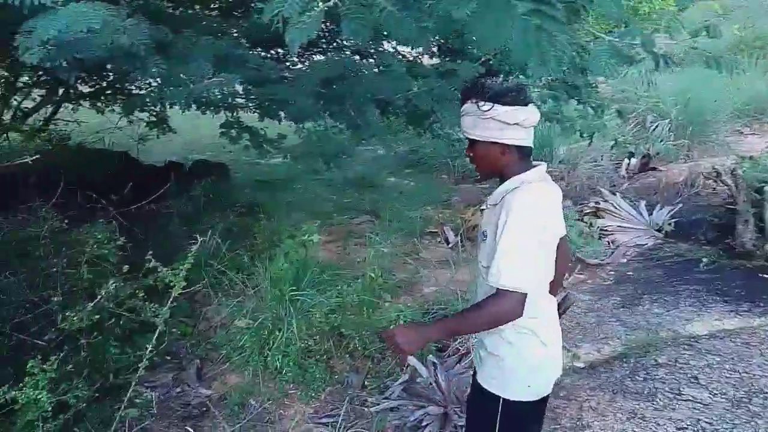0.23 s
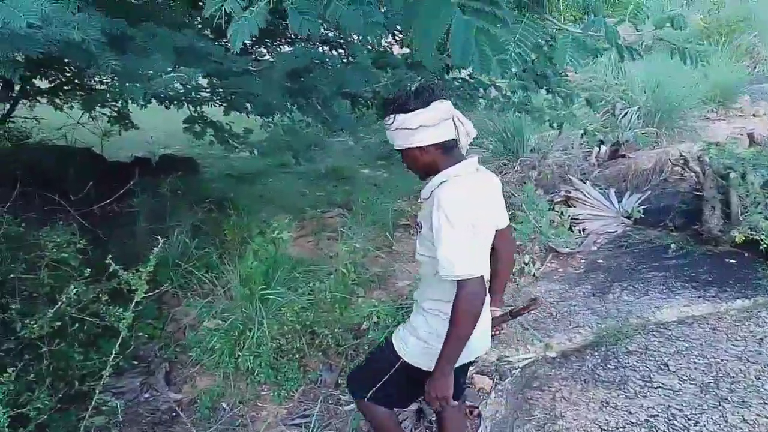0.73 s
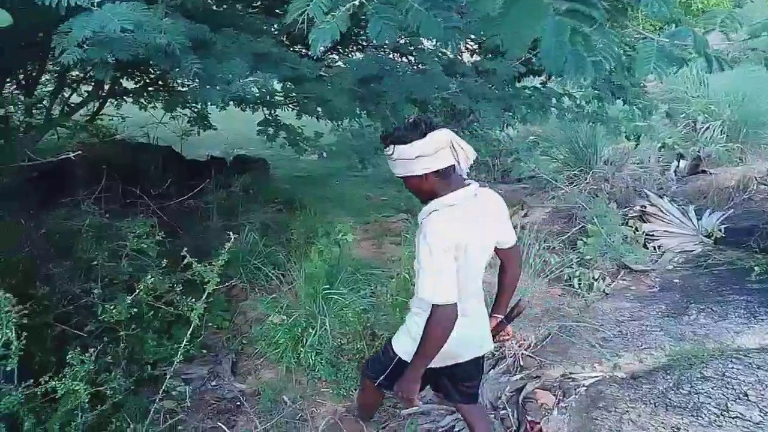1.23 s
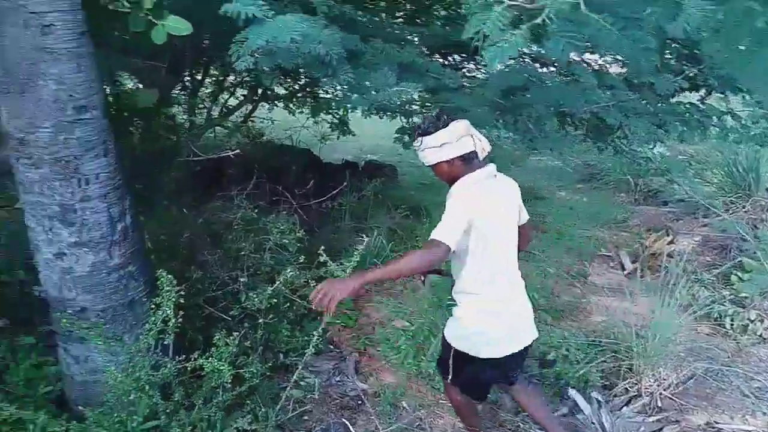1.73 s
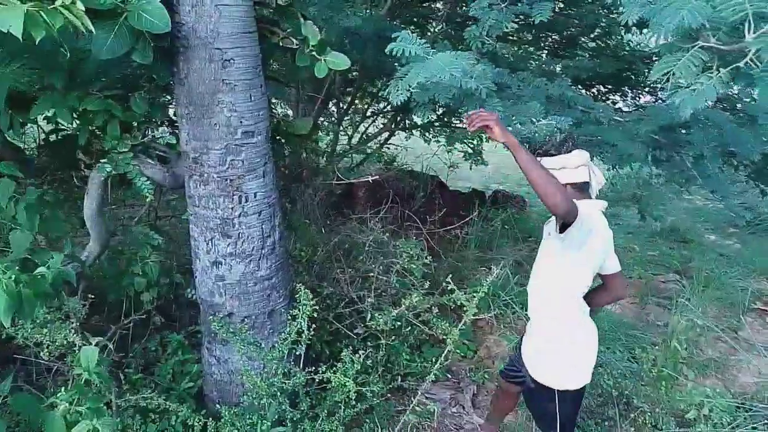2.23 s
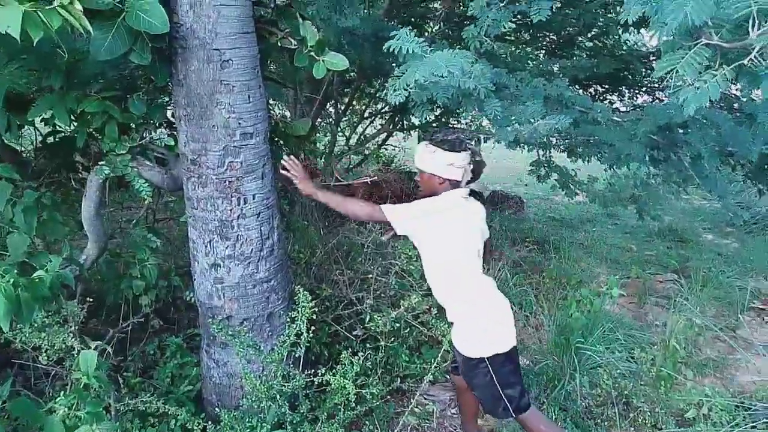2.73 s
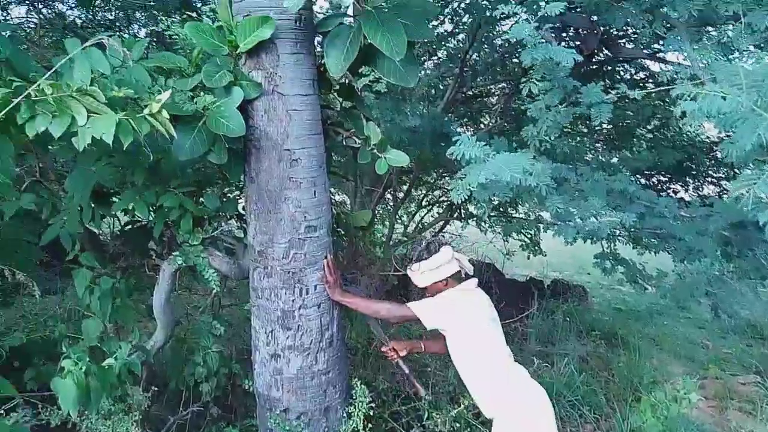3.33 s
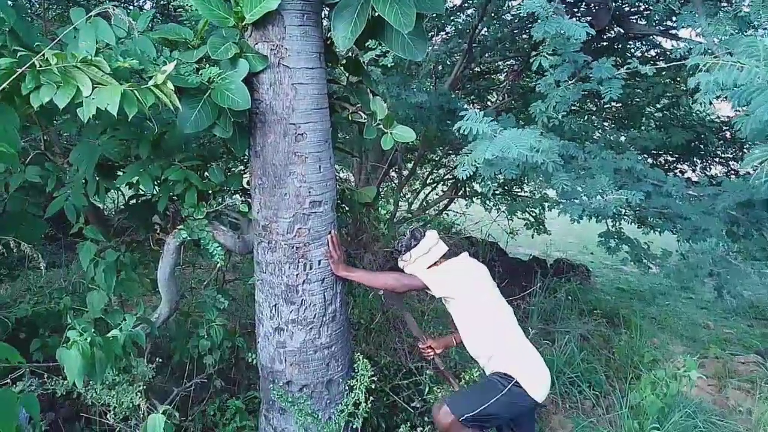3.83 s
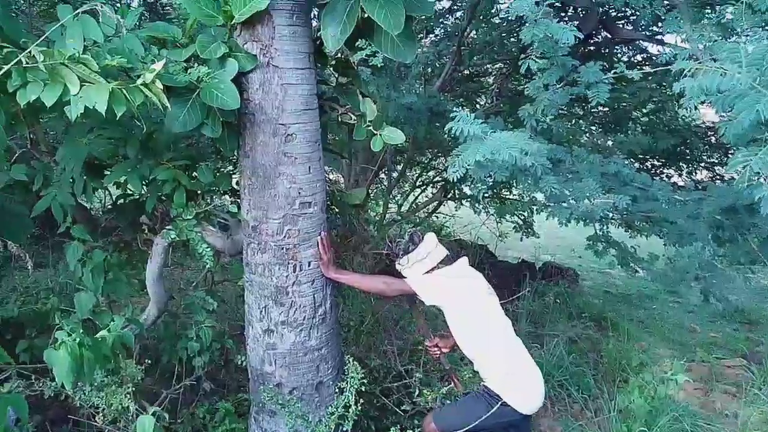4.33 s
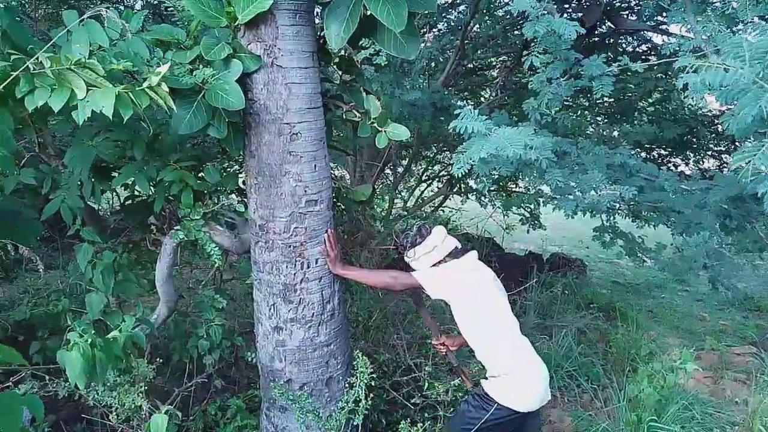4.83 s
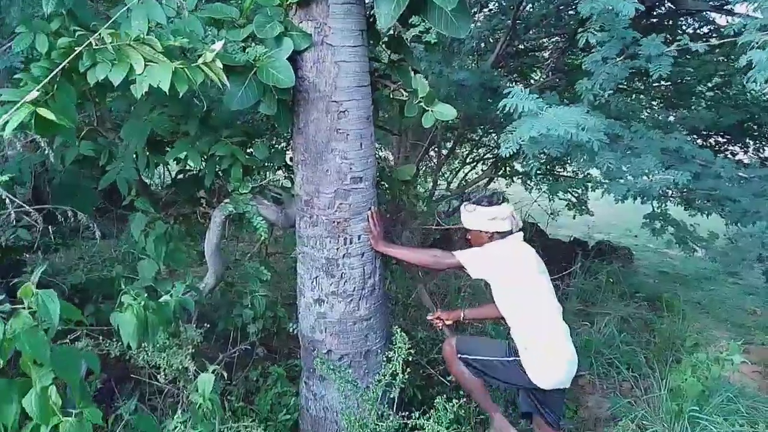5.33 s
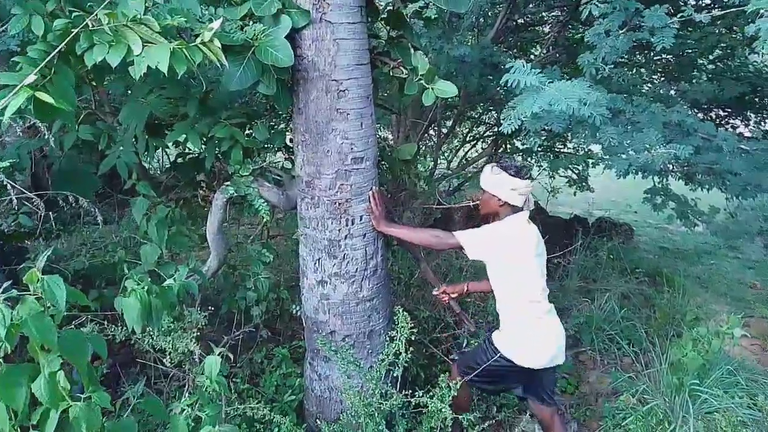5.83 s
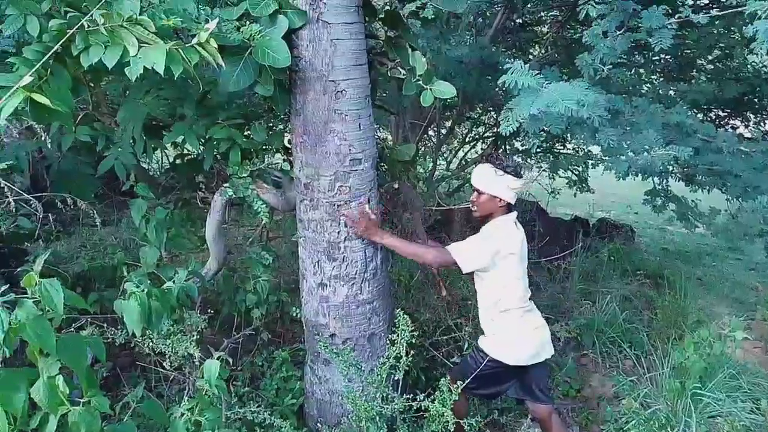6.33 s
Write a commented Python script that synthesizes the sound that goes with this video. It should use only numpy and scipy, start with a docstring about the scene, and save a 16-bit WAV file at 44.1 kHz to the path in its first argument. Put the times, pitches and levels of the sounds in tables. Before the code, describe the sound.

A faint airy hiss and thin, high insect drone sit under everything. Tiny dry twig snaps tick at 0.1-0.2 s, a weak chirp at 0.6, and sparse crackles until 1.5. At 1.65 a snap begins a burst of quick blade knocks on stems and bark, hard and clicky with clipped metallic ring, to about 2.0, amid rustling leaves. A sharp twig crack lands at 2.4, a rough bird churr runs 2.45-2.7, and gliding whistles come at 2.9, 3.3 and 3.7. A louder snap at 3.1 leads into scattered crackling. A strong double knock of steel hits at 3.9. After quieter small snaps and a crisp one at 4.8, a clank at 5.0 rings briefly, with a dull thud at 5.27. Leaves crunch and blade taps cluster around 5.3-5.6. Insects swell from 5.3; only faint snaps remain to 6.5. Close, dry, essentially mono, with short woodland echoes.

```python
"""A faint airy hiss and droning insects come first, then small snaps and crackles of dry undergrowth.
Someone steps through it to a tree, a steel blade in hand knocking on bark and stems; a bird whistles and churrs.
Air, insects and leaves are shaped noise; snapping twigs are short noise bursts with a thud below.
The blade is a set of fading sines plus a wood crack; whistles are gliding sines; the churr is rough pulses.
A small mono microphone hears it all, with added echoes off the woods for blade, twigs and bird."""
import sys
import numpy as np
from scipy import signal
from scipy.io import wavfile

SR = 44100
rng = np.random.default_rng(int(sys.argv[2]) if len(sys.argv) > 2 else 0)


def put_to_file(sound):
    """Save the sound as 16-bit audio at rate SR, in the file named by the first command-line argument."""
    columns = np.atleast_2d(sound).T  # one column per channel
    safe = np.clip(columns, -1, 1)
    whole_steps = np.round(safe * 32767)
    wavfile.write(sys.argv[1], SR, whole_steps.astype(np.int16))


N = 290178  # length in samples


def amp(db):
    """Turn decibels into a plain multiplier."""
    return 10 ** (np.asarray(db) / 20)


def rms_one(x):
    """Scale a sound to an average (rms) level of 1."""
    return x / np.sqrt(np.mean(x ** 2) + 1e-20)


def in_time(rows):
    """Draw straight lines between the rows of a table whose first column is start_s."""
    start_s, *columns = np.transpose(rows)
    return [np.interp(np.arange(N) / SR, start_s, column) for column in columns]


def drift(rate_hz):
    """Smooth random wandering of spread 1; a higher rate wanders faster."""
    r = np.exp(-2 * np.pi * rate_hz / SR)
    noise = rng.standard_normal(N + SR)
    wander = signal.lfilter([1], [1, -2 * r, r * r], noise)
    return rms_one(wander[SR:])  # skip the filter's first second


def resonance(x, hz, width_hz):
    """Favour one pitch, as a hollow or springy body does: a two-pole peak of gain 1."""
    r = np.exp(-np.pi * width_hz / SR)
    feedback = [1, -2 * r * np.cos(2 * np.pi * hz / SR), r * r]
    return signal.lfilter([(1 - r * r) / 2, 0, (r * r - 1) / 2], feedback, x)


def resonances(x, peaks):
    """Add several peaks side by side, each filtered twice, with every other one flipped in sign."""
    total = 0
    for k, (hz, width_hz, level_db) in enumerate(peaks):
        twice = resonance(resonance(x, hz, width_hz), hz, width_hz)
        total = total + amp(level_db) * (-1) ** k * twice
    return total


def add(out, start_s, sound):
    """Mix a short sound into the whole at its start time."""
    at = round(start_s * SR)
    out[at:at + len(sound)] += sound[:N - at]


# Tone colour of the background air: pitch_hz [Hz], level_db [dB per Hz, relative]
AIR_COLOUR = [(20, -7), (37, -20.5), (98, -10), (163, -30), (216, -11), (347, -4), (459, -9), (1290, -11.5),
              (3160, -5.5), (5600, -28), (7900, -23), (9400, -27), (12100, -67), (16000, -47)]
AIR_DB = -58  # rms level of all bands together


def air(patchy_db):
    """Far leaves and the microphone's own hiss: third-octave bands of noise that flicker a little."""
    out = 0
    edges = 20 * 2 ** np.arange(0, 9.9, 1 / 3)
    pitch_hz, level_db = np.transpose(AIR_COLOUR)
    white = rng.standard_normal((2, N + SR // 2))
    for k, (low, high) in enumerate(zip(edges, edges[1:])):
        band_filter = signal.butter(2, [low, high], "band", fs=SR, output="sos")
        band = signal.sosfilt(band_filter, white[k % 2])[SR // 2:]  # neighbours use different noise
        db = np.interp(np.log(low * high) / 2, np.log(pitch_hz), level_db)
        out = out + amp(db + patchy_db * drift(1.96)) * band
    return amp(AIR_DB) * rms_one(out)


# Rise and fall of the insect chorus: start_s [s], level_db [dB rms before throbbing]
CHORUS = [(0.0, -74), (1.75, -72), (2.23, -68), (2.56, -90), (4.27, -73), (4.58, -69), (5.06, -71),
          (5.37, -61), (5.81, -68), (6.08, -60.5), (6.58, -61)]
CHORUS_HZ = 7000
# Steady insect singers: pitch_hz [Hz], width_hz [Hz, each filter pass], level_db [dB rms before drift]
SINGERS = [(6396, 710, -67.5), (7310, 260, -72.5), (8050, 80, -82), (8680, 730, -79.5)]


def insects():
    """Bands of noise: a throbbing chorus that swells, and steadier singers."""
    throb = amp(in_time(CHORUS)[0] + 1.5 * drift(8.4))
    out = throb * rms_one(resonances(rng.standard_normal(N), [(CHORUS_HZ, 800, 0)]))
    for pitch_hz, width_hz, level_db in SINGERS:
        loudness = amp(level_db + 2.0 * drift(0.98))
        out += loudness * rms_one(resonances(rng.standard_normal(N), [(pitch_hz, width_hz, 0)]))
    return out


# Treble of dry leaves and splintering wood: pitch_hz [Hz], width_hz [Hz, each filter pass], level_db [dB]
SIZZLE = [(9090, 2330, 7), (7000, 910, -18), (10600, 780, -21)]


def sizzle(noise):
    """Shape noise into the treble of crackling leaves and wood."""
    return resonances(noise, SIZZLE)


# The very highest treble: pitch_hz [Hz], width_hz [Hz, each filter pass], level_db [dB]
TOP = [(14500, 16000, 0)]


def top_treble(noise):
    """Shape noise into the airy top above the sizzle."""
    return resonances(noise, TOP)


# Leaves underfoot: start_s [s], body_level_db [dB rms], treble_level_db [dB rms]
LEAVES = [(0.0, -75, -71.5), (0.75, -80, -99), (1.02, -66.5, -70.5), (1.24, -59.5, -80), (1.61, -63.5, -76),
          (1.81, -45.5, -68), (1.96, -50, -72), (2.2, -60.5, -77), (2.58, -56, -73), (3.3, -51.5, -64.5),
          (3.68, -56.5, -69.5), (3.82, -50.5, -70), (4.01, -53, -71), (4.2, -64.5, -76), (4.8, -69, -71.5),
          (5.04, -54, -65), (5.19, -53.5, -66), (5.46, -50.5, -59.5), (5.62, -59.5, -69.5),
          (6.58, -63, -72)]
CRACKLES_PER_S = 400.0  # before clumping makes them denser and sparser
BRUSH = 0.21            # hiss under the crackles: its spread next to a crackle of height 1


def leaves():
    """Leaves bend and break in clumped tiny crackles on a soft brushing hiss."""
    body_db, treble_db = in_time(LEAVES)
    chance = np.minimum(rng.exponential(1, (2, N)), 4)
    heights = amp([[3.0], [4.0]] * chance) * rng.choice([-1, 1], (2, N))
    # both rows crackle at the same moments
    born = rng.random(N) < CRACKLES_PER_S * amp(7.0 * drift(20)) / SR
    grains = heights * born + BRUSH * rng.standard_normal((2, N))
    body = resonances(grains[0], [(2100, 3260, -0.5), (3180, 790, 8.5), (4040, 480, -11.0)])
    treble = sizzle(grains[1]) + amp(-12.5) * top_treble(grains[1])
    return amp(body_db) * rms_one(body) + amp(treble_db) * rms_one(treble)


ATTACK_S = .0012  # rise to full height of a blow or snap
CLICK = 5         # height of the first break, against splintering noise of spread 1
GROUND = (254, 270, -11)  # trunk or ground under every contact: Hz, width in Hz, dB
PUSH_S, THUD_WIDTH_HZ = 0.00013, 490  # the push peaks after this time; width of the wood's own note


def crack(peak_db, hz, thud_hz, thud_db, sizzle_db, top_db, t60_s):
    """Wood splinters: a noise burst with a sharp first break, a thud below, sizzle and top above."""
    t = np.arange(SR // 8) / SR
    burst = rng.standard_normal((4, len(t))) * amp(-60 * t / t60_s) * np.minimum(t / ATTACK_S, 1)
    burst[[0, 2], int(ATTACK_S * SR)] += CLICK * np.array([1, .5])
    centre = rms_one(resonances(resonance(burst[0], hz, 1500), [(hz, 2200, 0)]))
    push = t / PUSH_S * np.exp(-t / PUSH_S) + 0.033 * burst[1]
    thud = resonances(push, [GROUND, (thud_hz, THUD_WIDTH_HZ, 0)])
    sound = centre + amp(thud_db) * rms_one(thud)
    sound += amp(sizzle_db) * rms_one(sizzle(burst[2]))
    sound += amp(sizzle_db + top_db) * rms_one(top_treble(burst[3]))
    # peak_db sets the outline peak of the centre part alone
    return amp(peak_db) * sound / np.abs(signal.hilbert(centre)).max()


# Twigs snapping: start_s [s], peak_level_db [dB, centre part], pitch_hz [Hz, centre],
# thud_level_db [dB over centre], sizzle_level_db [dB over centre], top_level_db [dB over sizzle]
TWIGS = [(.1157, -45, 2800, -22, -30, -15), (.1682, -39, 2880, -27, -19, -16),
         (.21, -37, 3160, -32, -15, -24), (0.9804, -50, 3460, -16, -16, -9),
         (1.1894, -44, 3040, -18, -15, -18), (1.5015, -49, 2940, -14, -2, -26),
         (1.6353, -38, 3040, -27, -12, -21), (1.6552, -25, 3160, -38, -17, -11),
         (1.8024, -29.5, 3800, -25, -9, -43), (1.9134, -30.5, 3100, -27, -9, -38),
         (2.1261, -35.5, 3200, -24, -13, -27), (2.1592, -36.5, 3060, -25, -11, -26),
         (2.3992, -20, 3500, -19, -3.5, -12), (2.4441, -29, 3000, -19, -9, -12),
         (2.6994, -40, 3160, -17, -13, -12), (2.7604, -38, 3850, -24, -14, -21),
         (2.8077, -40, 2970, -11, -14, -25), (3.0788, -15.5, 2770, -14.5, -4.5, -5),
         (3.114, -26, 2800, -14.5, -1, -17), (3.1766, -30, 3100, -24, -35, -17),
         (3.2688, -33.5, 3100, -11, -15, -29), (3.38, -24.5, 3320, -36, -34, -21),
         (3.4196, -36, 2920, -26, -28, -19), (3.454, -34.5, 2800, -32, -7, -37),
         (3.5693, -34.5, 2930, -22, -11, -26), (3.6108, -34, 2800, -33, -17, -19),
         (3.6503, -32, 2900, -35, -12, -12), (3.69, -40, 3380, -26, -22, -22),
         (4.3164, -44, 3190, -23, -23, -16), (4.4294, -40, 3050, -20, -12, -28),
         (4.5012, -39, 3100, -27, -17, -23), (4.545, -43.5, 2930, -24, -17, -23),
         (4.771, -26, 3380, -23, -12.5, -2), (5.229, -51, 3200, -17, 6, -30),
         (5.319, -48, 3300, -25, 0, -8), (5.329, -29, 3230, -22, -15, -32),
         (5.3464, -46, 3810, -19, -1, -33), (5.3731, -31.5, 3300, -16, -12, -31),
         (5.4564, -41, 3480, -14, 4, -35), (5.4674, -37, 3190, -18, -1, -24),
         (5.4774, -37, 3210, -12, -4, -17), (6.0448, -41, 2940, -23, -22, -30),
         (6.2992, -44, 2520, -23, -9, -30)]
TWIG_T60_S, TWIG_THUD_HZ = .021, 706  # time to fade by 60 dB; pitch of the thud


def twigs():
    """Every twig breaks with one short crack."""
    out = np.zeros(N)
    for start_s, peak_db, pitch_hz, thud_db, sizzle_db, top_db in TWIGS:
        snap = crack(peak_db, pitch_hz, TWIG_THUD_HZ, thud_db, sizzle_db, top_db, TWIG_T60_S)
        add(out, start_s, snap)
    return out


EDGE_S = .003  # soft ends of a whistled note


def tone(hz, db):
    """A sine that follows pitch and rms level sample by sample, with soft ends."""
    t = np.arange(len(hz)) / SR
    edge = np.clip(np.minimum(t, t[-1] - t) / EDGE_S, 0, 1)
    return np.sqrt(2) * edge * amp(db) * np.sin(2 * np.pi * np.cumsum(hz) / SR)


# A faint rising note, its start and its end: start_s [s], pitch_hz [Hz], level_db [dB rms before flutter]
CHIRP = [(.568, 3310, -59.5), (.635, 4600, -75)]
# Bird phrases: start_s [s], top_pitch_hz [Hz], high_level_db, fall_level_db, low_level_db [dB before flutter],
# swell_db_per_s [dB per s, of the low note]
PHRASES = [(2.889, 4550, -50.5, -43, -40.5, -330), (3.303, 4345, -47.5, -46.5, -57, 103),
           (3.689, 4450, -49.5, -47, -51, -34)]
# Arch opening each phrase: length_share [0 to 1], pitch_share [share of top pitch], level_db [dB, added]
ARCH = [(0, .62, -4), (.08, .77, 2), (.17, .94, -5), (.38, 1, 0), (.48, .95, -4), (.56, .85, 0),
        (.65, .7, -16), (.73, .655, -5), (.87, .62, 0), (1, .62, -18)]
ARCH_S, ARCH_TURN = .075, .62  # arch length; share of it where the high part gives way to the fall
LOW_AFTER_S, LOW_S = .096, .087  # entry of the low note after the phrase starts, and its length
LOW_START_HZ, LOW_END_HZ, LOW_SLIDE_S, LOW_ATTACK_S = 2420, 2000, .015, .006


def whistles():
    """Near-pure gliding notes: a chirp, then phrases of an arch and a low slide, all fluttering a little."""
    out = np.zeros(N)
    (start_s, *first), (end_s, *last) = CHIRP
    pitch_hz, level_db = np.linspace(first, last, int((end_s - start_s) * SR)).T
    add(out, start_s, tone(pitch_hz, level_db))
    length_share, pitch_share, arch_db = np.transpose(ARCH)
    for start_s, top_hz, high_db, fall_db, low_db, swell_db_per_s in PHRASES:
        u = np.linspace(0, 1, int(ARCH_S * SR))
        arch_hz = top_hz * np.interp(u, length_share, pitch_share)
        part_db = np.where(u < ARCH_TURN, high_db, fall_db)
        add(out, start_s, tone(arch_hz, part_db + np.interp(u, length_share, arch_db)))
        t = np.arange(int(LOW_S * SR)) / SR
        low_hz = LOW_END_HZ + (LOW_START_HZ - LOW_END_HZ) * np.exp(-t / LOW_SLIDE_S)
        low = np.minimum(t / LOW_ATTACK_S, 1) * tone(low_hz, low_db + swell_db_per_s * t)
        add(out, start_s + LOW_AFTER_S, low)
    return out * amp(2.5 * drift(60))


# Ringing notes of the blade: pitch_hz [Hz], t60_s [s to fade by 60 dB]
BLADE_NOTES = [(425, 0.46), (915, 0.13), (1205, 0.7), (1809, 0.17), (2200, 0.26), (2487, 0.26),
               (3190, 0.08), (3470, 0.2), (3845, 0.13), (4140, 0.019), (4479, 0.23), (4805, 0.16),
               (5395, 0.075)]
# How strongly each ringing note answers a blow on each part of the blade:
# part [name], then one level_db [dB] per row of BLADE_NOTES
BLADE_PARTS = {"tip": [-31.5, -38, -23.5, -28, -25, -9, -8, -8, -12, 12.5, -11, -36, -5.5], "edge": [-28.5,
               -34, -25.5, -21.5, -19.5, -12, -1.5, -18, -10, -12, -22, -10.5, -20.5], "back": [-33, -25,
               -18, -27.5, -16.5, -29, 1.5, -12, -17, -35, -14.5, -54, -22], "flat": [-33, -33, -16.5,
               -14.5, -29, -20, -6.5, -17.5, -7, -30, -26, -43, -26], "heel": [-30, -16.5, -15.5, -17, -8,
               -3.5, -1, -16, -18, -4, -28, -23, -24], "handle": [-24.5, -17, -26, -28, -29.5, -18, -2, -41,
               -32, -32, -36, -40, -38]}
# Blows on bark and stems: start_s [s], part [name], ring_s [s until touched still], clack_level_db [dB],
# ring_level_db [dB over clack], crack_level_db [dB, peak of its centre], thud_pitch_hz [Hz],
# thud_level_db [dB over crack], sizzle_level_db [dB over crack]
BLOWS = [(1.69, "tip", 0.065, -24, 2.5, 0.5, 1220, -21, -25),
         (1.746, "back", .051, -38.5, 13, -36, 1200, -25, -32),
         (1.796, "edge", 0.018, -23, 0.5, -35, 333, -10, -4),
         (1.81, "edge", 0.0079, -36, 3, -22, 1190, -15.5, -36),
         (1.849, "edge", .028, -34.5, 0, -52, 1200, -20, -25),
         (1.869, "back", 0.013, -34, -1, -23.5, 400, -22, -34),
         (1.904, "edge", .045, -23, -3.5, -26, 1050, -19, -15),
         (1.954, "edge", .02, -32, -4.5, -50, 400, -20, -25),
         (1.9781, "edge", 0.056, -33, -7, -29, 370, -18, -18),
         (2.212, "edge", 0.037, -53.5, 11, -53, 1300, -23, -4),
         (3.88, "back", 0.052, -13.5, -1.5, -6.5, 1070, -14.5, -28),
         (3.9381, "handle", 0.014, -18, -6, -21.5, 1100, -19, -32),
         (4.036, "handle", 0.027, -42, -8, -42, 350, -29, -34),
         (5.018, "flat", .254, -16, -1, -11, 338, -22.5, -34),
         (5.268, "handle", 0.18, -30, 0.5, -47, 760, 18.5, -25),
         (5.538, "heel", 0.034, -35, 2, -26.5, 840, -11, -23),
         (5.562, "heel", 0.072, -32, -3.5, -42, 810, 0, -26),
         (5.596, "heel", 0.3, -46.5, 5.5, -40, 1200, -2, -5)]
CLACK_T60_S = .08  # notes that fade in this time or less make the clack, the others the ring
CRACK_HZ, CRACK_T60_S, CRACK_TOP_DB = 3150, .028, -42  # top is counted over the sizzle


def blade():
    """Each blow cracks on the wood and rings the steel's own notes until a touch stills them."""
    out = np.zeros(N)
    for start_s, part, ring_s, clack_db, ring_db, crack_db, thud_hz, thud_db, sizzle_db in BLOWS:
        t = np.arange(int((ring_s + .05) * SR)) / SR
        stilled = amp(-60 * np.maximum(t - ring_s, 0) / 0.0029)
        shape = np.minimum(t / ATTACK_S, 1) * stilled
        for (pitch_hz, t60_s), part_db in zip(BLADE_NOTES, BLADE_PARTS[part]):
            level_db = clack_db + ring_db * (t60_s > CLACK_T60_S) + part_db
            fading = amp(level_db - 60 * t / t60_s)
            add(out, start_s, shape * fading * np.sin(2 * np.pi * pitch_hz * t))
        wood = crack(crack_db, CRACK_HZ, thud_hz, thud_db, sizzle_db, CRACK_TOP_DB, CRACK_T60_S)
        add(out, start_s, wood)
    return out


# A harsh churring call: start_s [s], pitch_hz [Hz before jitter], level_db [dB]
CHURR = [(2.441, 730, -50), (2.49, 508, -50.5), (2.568, 515, -48), (2.63, 540, -49.5), (2.69, 560, -57),
         (2.741, 610, -73)]
# The bird's throat: pitch_hz [Hz], width_hz [Hz, each filter pass], level_db [dB]
THROAT = [(2100, 370, -3), (2730, 1060, -0.5), (3120, 640, 5)]


def churr(jitter, breath):
    """Unsteady pulses and breath noise pass through the resonant throat of the bird."""
    pitch_hz, level_db = in_time(CHURR)
    cycles = np.cumsum(pitch_hz * (1 + jitter * drift(60))) / SR
    # one pulse for each finished cycle, of varying height
    pulses = np.diff(np.floor(cycles), prepend=0) * amp(2.8 * drift(90))
    source = pulses + breath * rng.standard_normal(N)
    voice = resonance(resonances(source, THROAT), 2650, 2400)
    # silent before the first row and after the last
    calling = np.interp(np.arange(N) / SR, [CHURR[0][0], CHURR[-1][0]], [1, 1], left=0, right=0)
    return calling * amp(level_db) * rms_one(voice)


def woods(x, t60_s, dull_hz):
    """Scatter off trunks and leaves: a noise tail that dies away, softened above dull_hz."""
    t = np.arange(int(t60_s * SR)) / SR
    tail = rng.standard_normal(len(t)) * amp(-60 * t / t60_s) * np.minimum(t / 0.0038, 1)
    tail = signal.lfilter(*signal.butter(1, dull_hz, fs=SR), tail)
    return signal.fftconvolve(x, tail / np.sqrt(np.sum(tail ** 2)))[:N]


def scene():
    """Mix all sources, with echoes off the woods for the near sounds and the bird."""
    near = blade() + twigs()
    birds = whistles() + churr(jitter=.014, breath=.07)  # shares of pitch and of pulse height
    mono = near + amp(-10.5) * woods(near, t60_s=0.089, dull_hz=8800)
    mono += birds + amp(-6.0) * woods(birds, t60_s=.37, dull_hz=10000)
    mono += leaves() + insects() + air(patchy_db=1.87)
    return np.array([mono, mono])


DIP_HZ, DIP_WIDTH_HZ, DIP_SHARE = 5930, 4100, 0.15  # the microphone's dip between its presence peaks
PEAK_LIMIT = 0.71              # loud peaks are rounded towards this height
WIDE_HZ, WIDE_DB = 10500, -13  # above this pitch the two channels differ, by this much before drift
CUTOFF_HZ = 15800              # almost nothing passes far above this pitch


def record(dry):
    """Both channels carry the same sound; peaks are rounded, the top is cut, and the highest treble differs a
    little between left and right."""
    mono = dry[0] - DIP_SHARE * resonance(dry[0], DIP_HZ, DIP_WIDTH_HZ)
    mono = PEAK_LIMIT * np.tanh(mono / PEAK_LIMIT)
    top = signal.sosfilt(signal.butter(8, WIDE_HZ, "high", fs=SR, output="sos"), mono)
    apart = amp(WIDE_DB) * top * drift(440) * [[1], [-1]]  # opposite signs left and right
    top_cut = signal.ellip(10, .5, 70, CUTOFF_HZ, fs=SR, output="sos")
    return signal.sosfilt(top_cut, mono + apart)


dry = scene()
out = record(dry)
put_to_file(out)
```